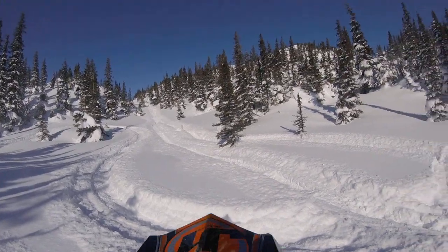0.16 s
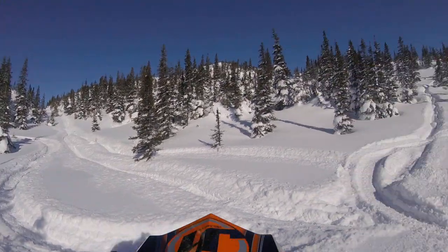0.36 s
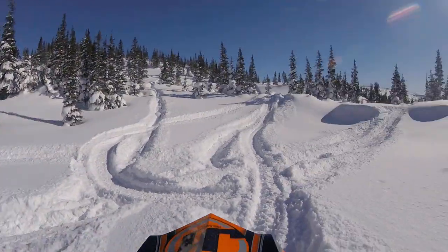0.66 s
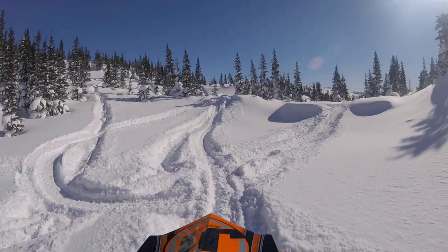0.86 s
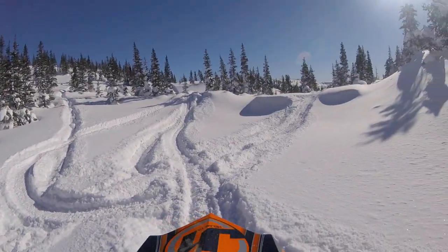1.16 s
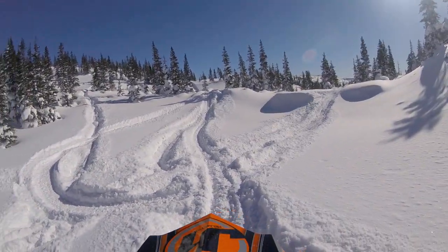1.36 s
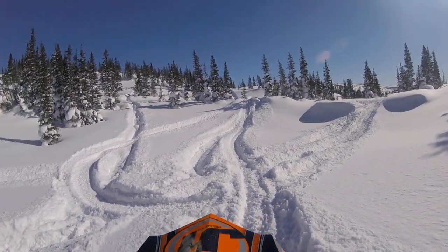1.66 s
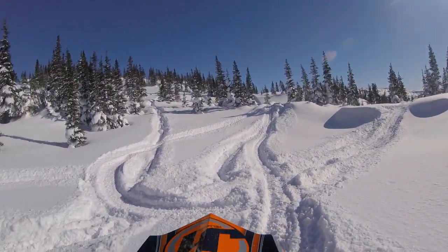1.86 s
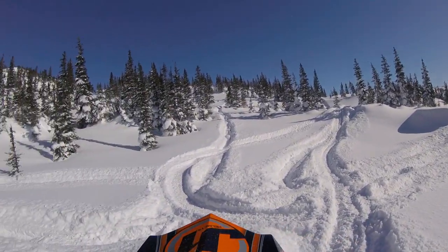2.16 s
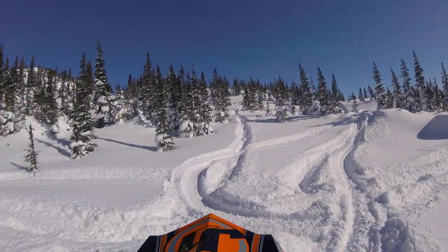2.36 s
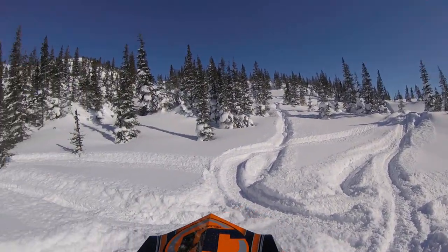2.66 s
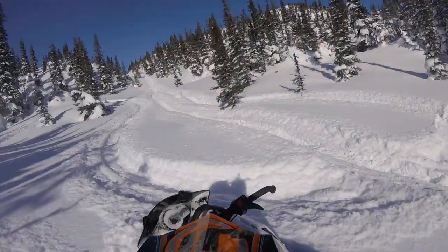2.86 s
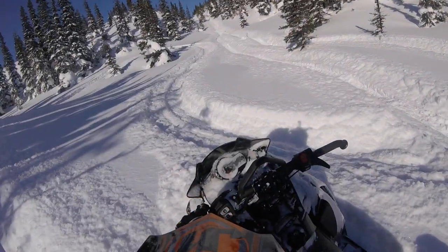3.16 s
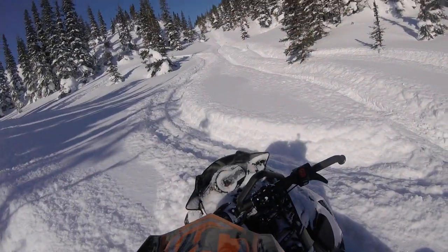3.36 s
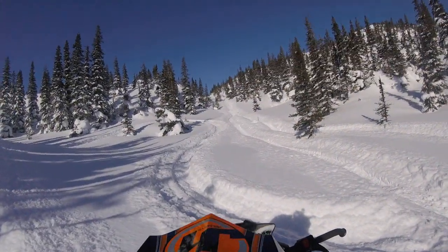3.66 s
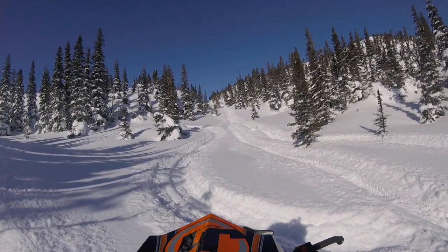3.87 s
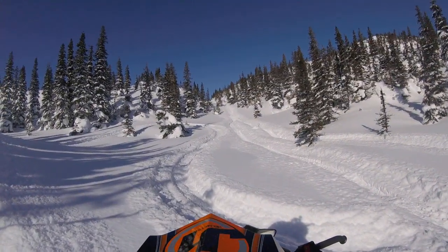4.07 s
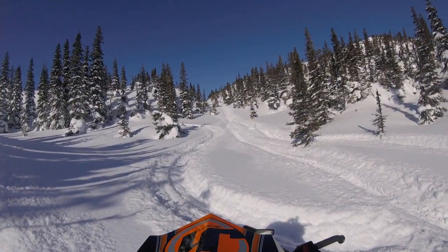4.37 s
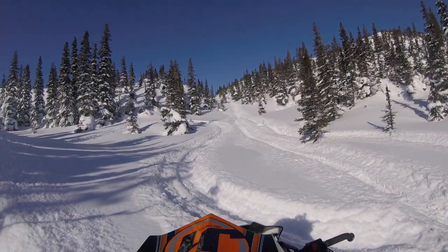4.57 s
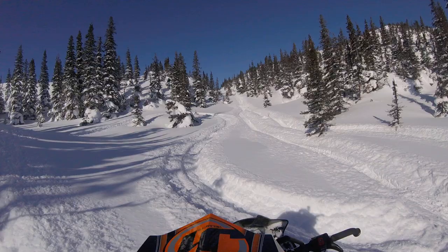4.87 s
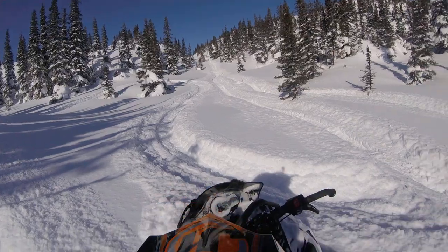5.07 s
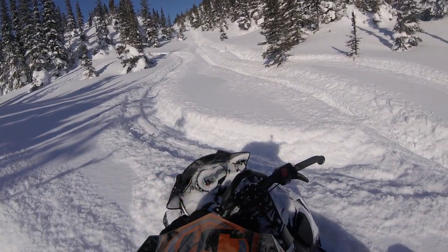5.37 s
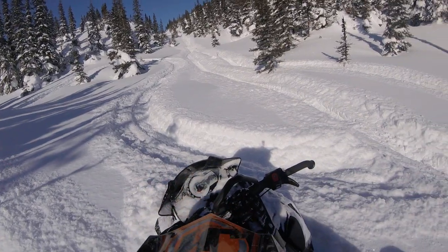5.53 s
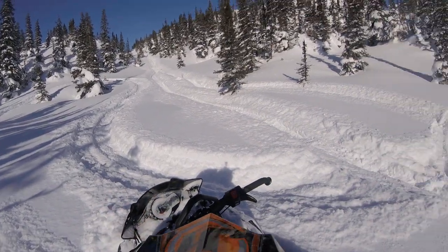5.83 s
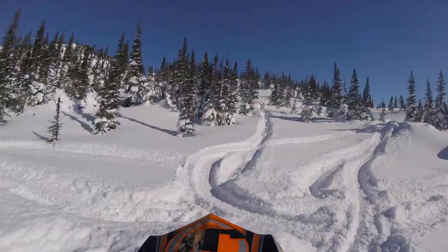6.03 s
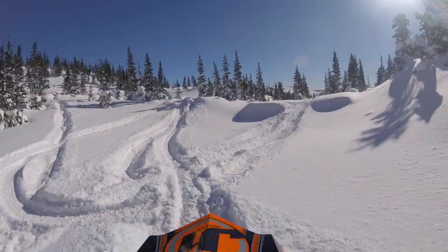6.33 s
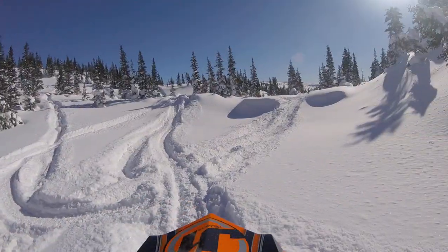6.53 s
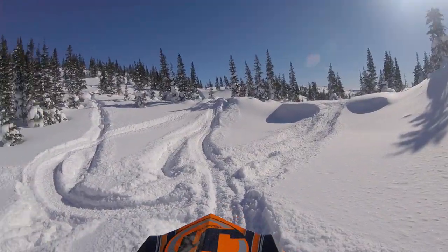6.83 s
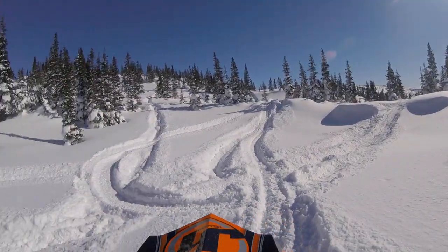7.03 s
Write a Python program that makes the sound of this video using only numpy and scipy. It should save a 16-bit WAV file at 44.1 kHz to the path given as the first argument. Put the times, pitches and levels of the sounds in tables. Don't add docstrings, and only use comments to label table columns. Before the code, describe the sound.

Low, fast exhaust pulses with irregular stronger pops run throughout over a boomy rumble and hollow silencer drone. Thin casing panels buzz, air hisses through the intake, and loose parts tick and scrape every turn. The engine slows at first, wavers and recovers. The helmet microphone faces it, turns away, returns, and turns away again, changing mainly the treble. Open snowy ground, close and dry.

```python
import sys
import numpy as np
from scipy import signal
from scipy.fft import rfft, irfft, next_fast_len
from scipy.io import wavfile

SR = 44100
rng = np.random.default_rng(int(sys.argv[2]) if len(sys.argv) > 2 else 0)


def generate_wav(signal):
    frames = np.transpose(np.atleast_2d(signal))
    scaled = np.clip(frames, -1, 1) * 32767
    pcm = np.round(scaled).astype(np.int16)
    wavfile.write(sys.argv[1], SR, pcm)


def level_to_linear(level):
    exponent = np.asarray(level, float) / 20
    return 10 ** exponent


N = 317520

# time_s, speed_turns_per_s
CRANK_SPEED = [(0.0, 36.92), (0.6, 31.89), (0.8, 30.65), (1.2, 29.37), (1.5, 29.13), (1.8, 29.39),
               (1.9, 29.89), (2.3, 30.15), (2.5, 31.27), (2.9, 31.83), (3.3, 31.82), (4.0, 30.64),
               (4.3, 30.93), (4.5, 30.42), (5.0, 31.36), (5.4, 31.07), (5.7, 32.02), (7.2, 31.9)]
# time_s, brightening_db
HEAD_FACING = [(0, 4), (.26, 0.5), (.46, -0.5), (.64, -5), (.84, -5.5), (2.61, -5.5), (2.85, -2.5),
               (3.09, 3), (3.31, 2.5), (3.9, 0), (5.05, 0.5), (5.35, 3.5), (5.7, 2.5), (6.04, 1),
               (6.14, -4.5), (6.7, -6), (6.86, -5), (7.2, -4.5)]
# first_s, apart_turns, count, level_db
LEFT_FIRINGS = [(0.0842, 12, 1, -16.5), (0.4296, 6, 1, -14), (0.6148, 3, 1, -18.5), (0.7106, 6, 1, -15),
                (0.9066, 5, 5, -16), (1.8237, 6, 2, -16.5), (2.125, 3, 2, -17.5), (2.39, 5, 2, -17),
                (2.677, 5, 3, -14), (3.1806, 6, 2, -13), (3.4967, 5, 2, -15.5), (3.8168, 5, 2, -20),
                (4.11, 5, 2, -14.5), (4.6634, 6, 2, -15), (5.0824, 3, 2, -18), (5.307, 4, 1, -18),
                (5.434, 5, 1, -13), (5.5928, 5, 2, -15), (5.8739, 4, 2, -17), (6.1875, 6, 1, -12.5),
                (6.3744, 6, 1, -17.5), (6.5941, 7, 2, -16.5), (7.002, 5, 2, -17.5)]
RIGHT_FIRINGS = [(.123, 6, 1, -16), (.2963, 6, 1, -14), (0.6312, 6, 1, -15), (0.825, 5, 5, -17),
                 (1.637, 3, 2, -18), (1.8746, 4, 3, -15), (2.2424, 3, 2, -18.5), (2.4702, 4, 1, -17),
                 (2.9767, 4, 2, -15), (3.4168, 4, 3, -16.5), (3.769, 4, 1, -21.5), (3.8986, 4, 5, -15.5),
                 (4.582, 5, 1, -21), (4.7444, 5, 2, -16.3), (5.033, 3, 2, -16), (5.2897, 4, 1, -16),
                 (5.3846, 4, 1, -27), (5.5132, 4, 2, -15.5), (5.7959, 4, 5, -16.5), (6.453, 5, 2, -17),
                 (6.7351, 4, 2, -17.5), (6.8895, 3, 1, -19), (6.9859, 4, 2, -15.5)]
# pitch_hz, level_db, t60_s, polarity_sign
PIPE_TONES = [(46.4, 9.5, .082, -1), (65.7, 18.1, .034, 1), (65.4, 3.6, .128, -1), (139.8, 2.9, .057, -1),
              (326.8, 7.3, .077, -1)]
# pitch_hz, level_db_per_hz
GAS_RUMBLE = [(7.1, -45), (12, -16), (43, 3.5), (70, 2), (131, -9), (149, -3), (200, -11), (260, -56.5)]
# pitch_hz, width_hz, level_db, crank_angle_turns, swing_db (below 0: shaking weakest at the
# angle), # knock_over_shaking_db
SILENCER_CHAMBERS = [(185.4, 15, -6.5, 0.639, 1.5, 8), (218, 25, -2.5, 0.08, -13, 0.5),
                     (248, 16.4, 1, 0.2635, -11.5, 12), (291.6, 68, 2, 0.464, 3, 2),
                     (373.8, 48, 4, .9, 1, 8), (447.6, 60, -1.5, .45, -4.5, 3)]
# pitch_hz, width_hz, level_db, crank_angle_turns, #
# swing_db (below 0: shaking weakest at the angle), knock_over_shaking_db
CASING_PANELS = [(616, 144, -9, 0.29, 2, -2.5), (702, 45, -4, 0.4, -2, 5), (744, 72, -4.5, 0.103, -3, -4.5),
                 (798.7, 38, -0.5, 0.45, 0.5, 4.5), (915, 134, -7, 0.26, -2.5, 1.5),
                 (1186, 545, -14, 0.18, 0.5, -5.5), (1354, 32, -14.5, 0.22, -4, -2.5),
                 (1030, 56, 1.5, .28, 5, 9), (992, 40, -4, .36, 5, 3)]
# time_s, peak_db
SIDE_KNOCKS = [
    (1.992, -36),
    (2.06, -34),
    (3.204, -17.5),
    (3.308, -17.5),
    (4.208, -22),
    (5.905, -21),
]
# pitch_hz, level_db_per_hz
INTAKE_HISS = [(700, -35.5), (1050, -13), (1250, -3.5), (1700, -10), (2500, -14.5), (3750, -23),
               (4600, -28.5), (6000, -58)]
# crank_angle_turns, level_db
LOOSE_CONTACTS = [
    (.14, -6),
    (0.329, 5.5),
    (0.404, -11.5),
    (0.481, 3.5),
    (0.631, -1.5),
    (0.782, -6.5),
    (0.909, -12.5),
]
# first_s, count, peak_db, dying_time_ms
STRIKING_BOUTS = [(.016, 3, -28.5, 2.7), (.158, 1, -22.5, 1.8), (.183, 3, -27, 1.8),
                  (0.3257, 4, -30.5, 1.3), (0.4474, 4, -30.5, 2.6), (0.568, 4, -27, 1.6),
                  (1.048, 6, -31, 1.4), (1.2482, 2, -29.5, 1.4), (1.3523, 1, -31, 1.1),
                  (1.4183, 3, -29.5, 1.43), (1.5578, 2, -27.5, 1.11), (1.6331, 7, -36, 1.3),
                  (2.2272, 1, -28, .72), (2.5017, 5, -29.5, 0.79), (2.664, 5, -26, 1.4),
                  (2.913, 1, -29, 1.1), (2.975, 1, -30, 1.3), (3.1642, 4, -25, 1), (3.3817, 5, -31, 1.3),
                  (3.8264, 24, -40.5, 0.86), (4.8055, 2, -30.5, 1), (4.885, 1, -29, 1.8),
                  (5.0634, 3, -34.5, 1.7), (5.486, 1, -31, 2), (5.6995, 6, -34, 1.8),
                  (6.0093, 4, -35.5, 1.1), (6.348, 3, -32, 0.92), (6.537, 4, -37, 2.3),
                  (6.7253, 5, -33.5, 1.6), (6.975, 3, -31.5, 1)]
# time_s, peak_db, dying_time_ms
FURTHER_TICKS = [
    (0.14, -43, 5.7),
    (0.77, -38, 4.4),
    (0.096, -34.5, 1.1),
    (2.5, -44, 1.4),
    (2.9, -38, 1.8),
    (.101, -27, 4.6),
    (.284, -25.5, 7),
    (2.2503, -26, 3.5),
]
# middle_s, half_length_s, boost_db
HEAD_SWINGS = [
    (0.57, 0.099, 4.5),
    (2.303, 0.21, 4),
    (2.783, .2, 6),
    (6.104, 0.14, 4),
]
# pitch_hz, width_hz, level_db
MIC_CASE = [(5290, 516, -6), (6503, 256, 2), (7020, 1640, -9), (9410, 1500, -18.5)]


def rms_one(x):
    return x / np.sqrt(np.mean(x ** 2) + 1e-20)


def in_time(rows):
    s, value = np.transpose(rows)
    return np.interp(np.arange(N) / SR, s, value)


def coloured(spectrum):
    hz, db = np.transpose(spectrum)
    size = next_fast_len(N)
    log_hz = np.log(np.arange(size // 2 + 1) * SR / size + 1)
    shape = level_to_linear(np.interp(log_hz, np.log(hz), db, left=-60, right=-60))
    noise = irfft(rfft(rng.standard_normal(size)) * shape, size)
    return rms_one(noise[:N])


def resonance(x, hz, width):
    r = np.exp(-np.pi * width / SR)
    feedback = [1, -2 * r * np.cos(2 * np.pi * hz / SR), r * r]
    return signal.lfilter([(1 - r * r) / 2, 0, (r * r - 1) / 2], feedback, x)


def clicks(seconds, sizes):
    out = np.zeros(N)
    at = np.clip(np.round(seconds * SR).astype(int), 0, N - 1)
    np.add.at(out, at, sizes)
    return out + 1e-18


def passes(turn, angle, count=1):
    return np.flatnonzero(np.diff(np.floor(count * (turn - angle)))) / SR


def turns_after(turn, s, turns):
    return np.interp(turn[round(s * SR)] + turns, turn, np.arange(N) / SR)


def per_turn(turn, spread_db):
    return level_to_linear(spread_db * np.interp(turn, np.arange(300), rng.standard_normal(300)))


def firings(turn):
    rest_db_per_doubling, usual_rest_s = -0.15, 0.08
    choke_s, choke_share, choke_from_db = 0.025, 0.43, -21.5
    rows = []
    for first, apart, count, level_db in LEFT_FIRINGS + RIGHT_FIRINGS:
        steps = round(apart) * np.arange(round(count))
        rows += [(at, level_db) for at in turns_after(turn, first, steps)]
    s, db = np.transpose(sorted(rows))
    rest = np.diff(s, prepend=0)
    back_pressure_db = choke_share * np.maximum(np.roll(db, 1) - choke_from_db, 0)
    choke_db = back_pressure_db * (rest < choke_s)
    doublings = np.log2(np.maximum(rest, usual_rest_s / 2) / usual_rest_s)
    return s, db + rest_db_per_doubling * doublings - choke_db


def exhaust(turn):
    blowdown_s, dip_delay_s, puff_db = 0.0012, 0.0082, -33
    s, db = firings(turn)
    openings = passes(turn, 0.11, count=2)
    puffs = level_to_linear(puff_db) * rng.standard_normal(600)[:len(openings)]
    train = clicks(s - dip_delay_s, level_to_linear(db)) + clicks(openings - dip_delay_s, puffs)
    bell = signal.windows.gaussian(441, blowdown_s * SR)
    blow = np.convolve(train, bell / bell.sum(), "same")
    out = 0
    for hz, level_db, t60, sign in PIPE_TONES:
        r = level_to_linear(-60 / (t60 * SR))
        w = 2 * np.pi * hz / SR
        push = [0, sign * level_to_linear(level_db) * np.sin(w)]
        out = out + signal.lfilter(push, [1, -2 * r * np.cos(w), r * r], blow)
    return out


def pumping(turn, speed, facing_db):
    tuned_speed = 32.23
    low_db = -25.5 + 2.5 * np.minimum(speed - tuned_speed, 0)
    high_db = -31.5 - 1.8 * np.maximum(speed - tuned_speed, 0) + 0.15 * facing_db
    lead = 0.27 + 0.1 * (np.minimum(speed, 32.1) - 31)
    low = level_to_linear(low_db) * per_turn(turn, 0.65) * np.cos(4 * np.pi * turn)
    high = level_to_linear(high_db) * per_turn(turn, 0.17) * np.cos(2 * np.pi * (4 * turn + lead))
    first = level_to_linear(-44) * np.cos(2 * np.pi * (turn + 0.15))
    fifth = level_to_linear(-49) * per_turn(turn, 2.5) * np.cos(2 * np.pi * (5 * turn - 0.35))
    return np.sqrt(2) * (low + high + first + fifth)


def gas_rumble():
    return level_to_linear(-38) * coloured(GAS_RUMBLE)


def shaken(modes, turn, uneven_db, jitter_s):
    out = 0
    for hz, width, level_db, angle, swing_db, knock_db in modes:
        swell = level_to_linear(swing_db * np.cos(2 * np.pi * (turn - angle)))
        swell = swell * per_turn(turn - angle + 0.5, uneven_db)
        at = passes(turn, angle - 0.13)
        chance = rng.standard_normal((300, 2))[:len(at)]
        sizes = level_to_linear(28.5 + knock_db + uneven_db * chance[:, 1])
        blows = clicks(at + jitter_s * chance[:, 0], sizes)
        force = (swell * rng.standard_normal(N) + blows) / np.hypot(1, level_to_linear(knock_db))
        ringing = resonance(resonance(force, hz, 1.6 * width), hz, 1.2 * width)
        out = out + level_to_linear(level_db) * ringing
    return rms_one(out)


def silencer_drone(turn, facing_db):
    level_db = -38.5 + 0.15 * facing_db
    return level_to_linear(level_db) * shaken(SILENCER_CHAMBERS, turn, uneven_db=1.2, jitter_s=0.0002)


def casing(turn, speed, facing_db):
    level_db = -39.5 + 0.77 * np.minimum(facing_db, 1.8) - 0.4 * (speed - 31)
    return level_to_linear(level_db) * shaken(CASING_PANELS, turn, uneven_db=1.6, jitter_s=0.0005)


def side_knocks():
    hz, width_hz, gain_db = 987, 104, 34
    s, db = np.transpose(SIDE_KNOCKS)
    blows = clicks(s, level_to_linear(db + gain_db))
    return resonance(resonance(blows, hz, width_hz), hz, 2 * width_hz)


def intake(turn, facing_db):
    since = (turn - 0.11) % 1
    snap = 1 + 1.45 * per_turn(turn - 0.11 + 0.5, 0.88) * np.exp(-since / 0.1)
    hiss = rms_one(snap * per_turn(turn, 0.8) * coloured(INTAKE_HISS))
    return level_to_linear(-47 + facing_db) * hiss


def contact_scuffs(turn):
    touches = 0
    for angle, contact_db in LOOSE_CONTACTS:
        at = passes(turn, angle)
        chance = rng.standard_normal((300, 2))[:len(at)]
        touches = touches + clicks(at + 0.0012 * chance[:, 0], level_to_linear(contact_db + 2.2 * chance[:, 1]))
    return signal.lfilter([1], [1, -np.exp(-1 / (0.00067 * SR))], touches)


def hard_ticks(turn):
    spread_db, jitter_s = 2.5, 0.0005
    rows = []
    for first, count, db, dying_ms in STRIKING_BOUTS:
        chance = rng.standard_normal((30, 2))[:round(count)] * (count > 1.5)
        at = turns_after(turn, first, np.arange(round(count))) + jitter_s * chance[:, 0]
        strengths = db + spread_db * np.clip(chance[:, 1], -2, 1.3)
        rows += [(s, strength, dying_ms) for s, strength in zip(at, strengths)]
    return rows


def in_case(shake, level_db):
    out = 0
    for k, (hz, width, db) in enumerate(MIC_CASE):
        out = out + level_to_linear(db) * (-1) ** k * resonance(shake, hz, width)
    hz, width, db = MIC_CASE[0]
    opening = level_to_linear(0.27 * (level_db + 51.5)) - 1
    out = out + opening * level_to_linear(db) * resonance(shake, hz, width)
    return signal.sosfilt(signal.butter(4, 4500, "high", fs=SR, output="sos"), out)


def rattle(turn, facing_db):
    t = np.arange(N) / SR
    swing_db = sum(db * np.exp(-((t - s) / half) ** 2) for s, half, db in HEAD_SWINGS)
    level_db = -49 + 1.08 * facing_db + swing_db
    ticks = level_to_linear(0.5 * (level_db + 48.5) - 29.5) * contact_scuffs(turn)
    after = np.arange(2200) / SR
    for s, db, dying_ms in hard_ticks(turn) + FURTHER_TICKS:
        i = round(s * SR)
        tick = level_to_linear(db + 8.0) * np.exp(-1000 * after / max(dying_ms, 0.2))
        ticks[i:i + len(after)] += tick[:N - i]
    noise = rng.standard_normal(N)
    dulled = resonance(ticks * noise, hz=6000, width=3600)
    shake = level_to_linear(level_db + 13.5) * per_turn(turn, 1.0) * noise + level_to_linear(-0.5) * dulled
    body = level_to_linear(-27) * resonance(ticks * noise, hz=3000, width=2400)
    return in_case(shake, level_db) + body


def top_hiss(shape):
    flutter_db, flutter_s = 2.5, 0.1
    band = signal.butter(4, [10250, 13300], "band", fs=SR, output="sos")
    hiss = level_to_linear(-67) * signal.sosfilt(band, rng.standard_normal(shape))
    return hiss * per_turn(np.arange(N) / SR / flutter_s, flutter_db)


def scene():
    speed = in_time(CRANK_SPEED)
    turn = 0.012 + np.cumsum(speed) / SR
    facing_db = in_time(HEAD_FACING)
    pipe = exhaust(turn) + pumping(turn, speed, facing_db) + gas_rumble()
    body = silencer_drone(turn, facing_db) + casing(turn, speed, facing_db) + side_knocks()
    bright = intake(turn, facing_db) + rattle(turn, facing_db)
    return (pipe + body + bright)[None]


def low_pass(x):
    return signal.sosfilt(signal.butter(12, 13620, fs=SR, output="sos"), x)


def record(dry):
    steep_cut = signal.cheby2(16, 40, 10020, fs=SR, output="sos")
    mix = signal.sosfilt(steep_cut, dry) + top_hiss(dry.shape)
    return low_pass(mix)


dry = scene()
out = record(dry)
generate_wav(out)
```